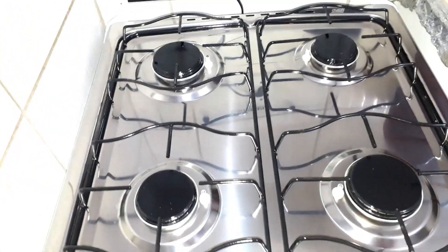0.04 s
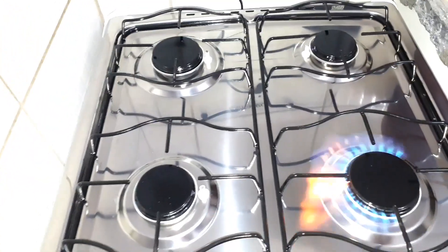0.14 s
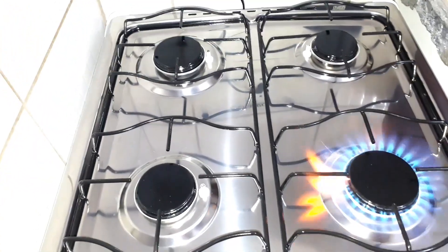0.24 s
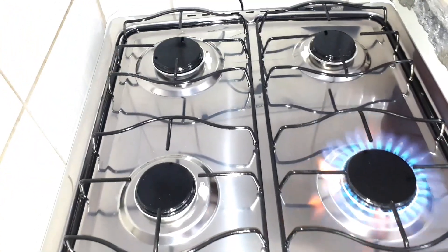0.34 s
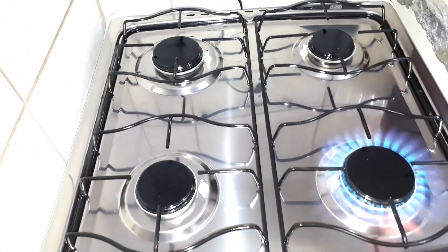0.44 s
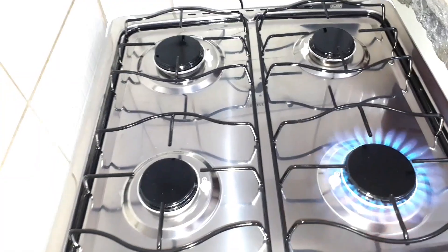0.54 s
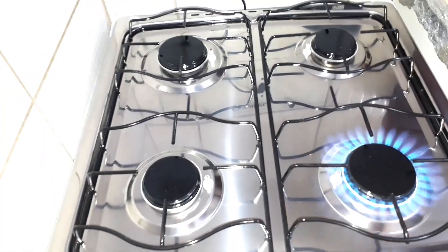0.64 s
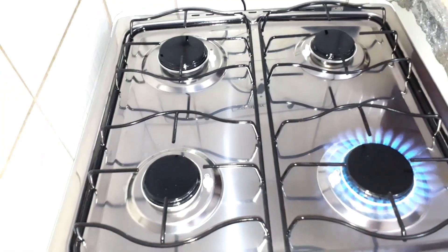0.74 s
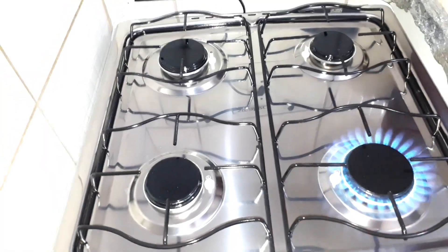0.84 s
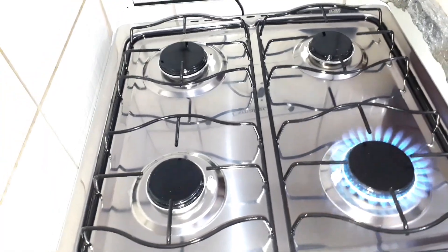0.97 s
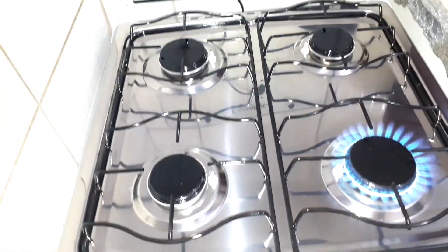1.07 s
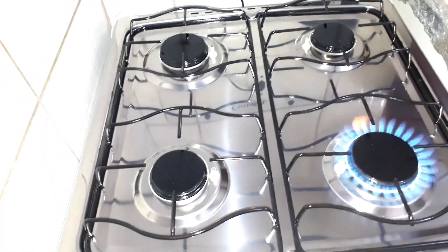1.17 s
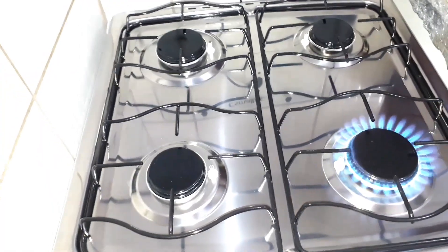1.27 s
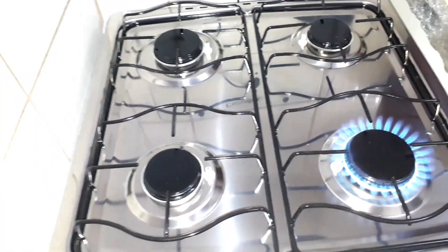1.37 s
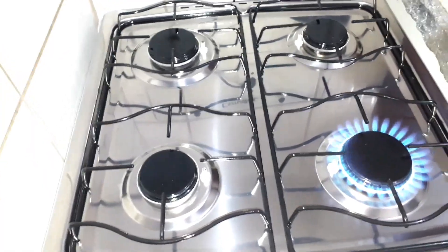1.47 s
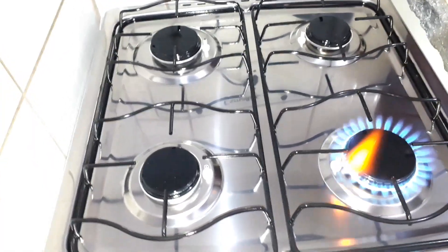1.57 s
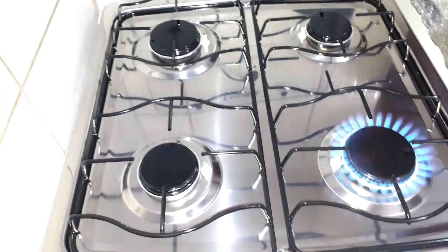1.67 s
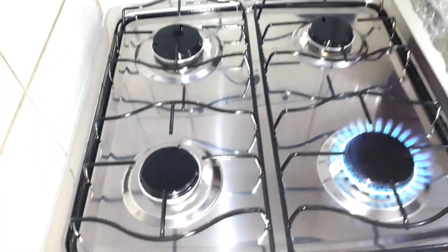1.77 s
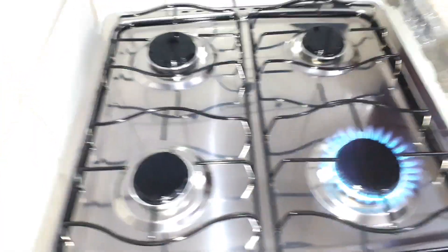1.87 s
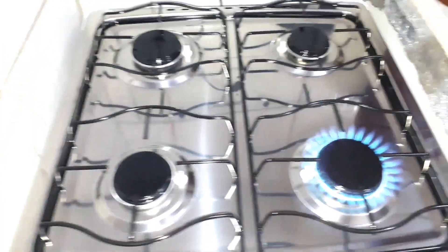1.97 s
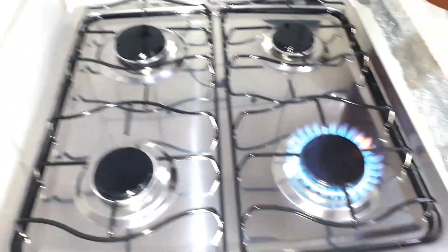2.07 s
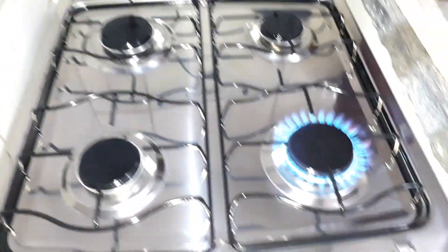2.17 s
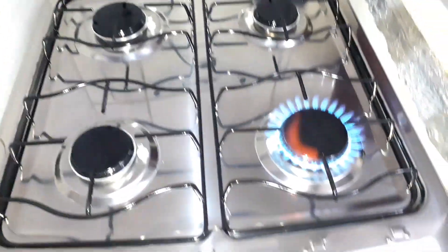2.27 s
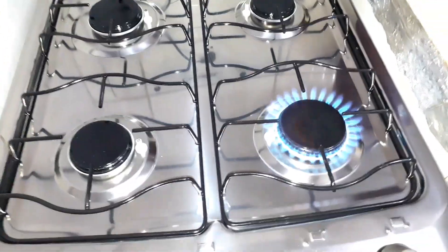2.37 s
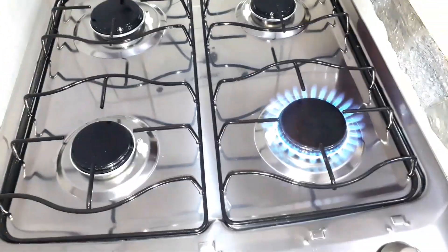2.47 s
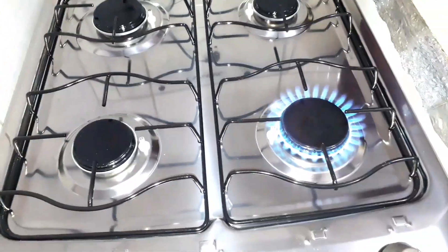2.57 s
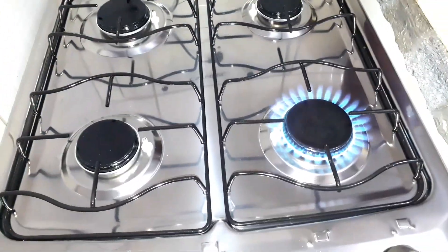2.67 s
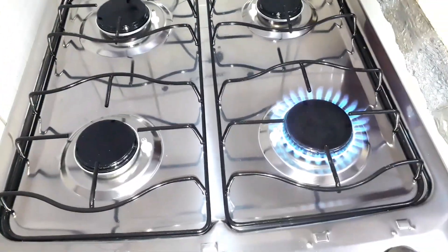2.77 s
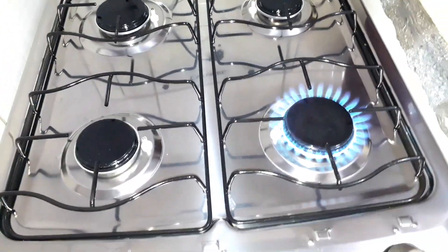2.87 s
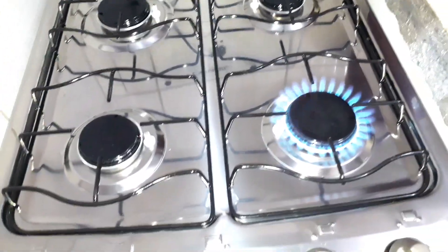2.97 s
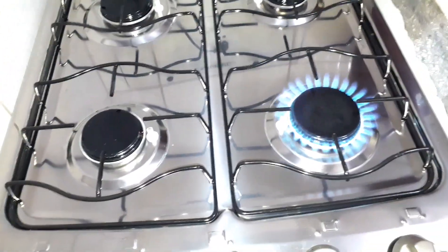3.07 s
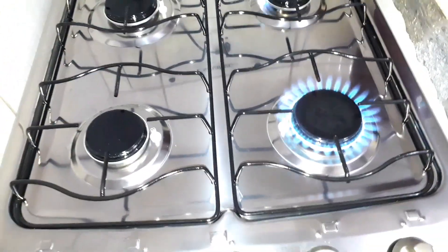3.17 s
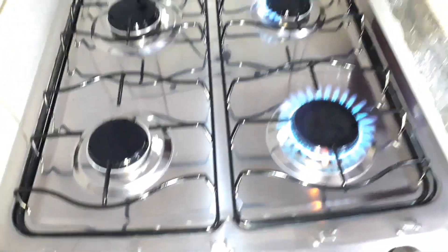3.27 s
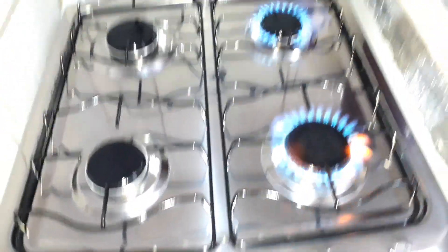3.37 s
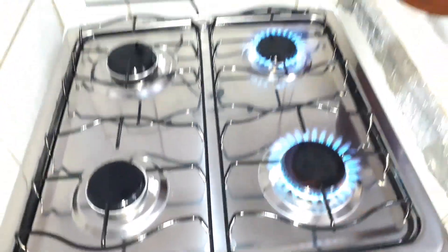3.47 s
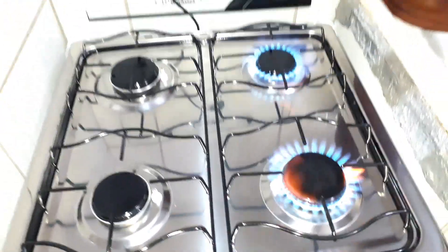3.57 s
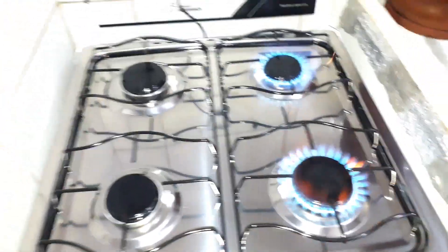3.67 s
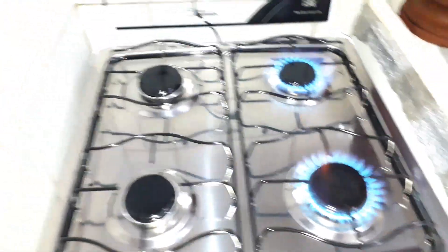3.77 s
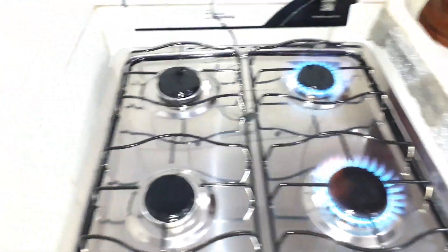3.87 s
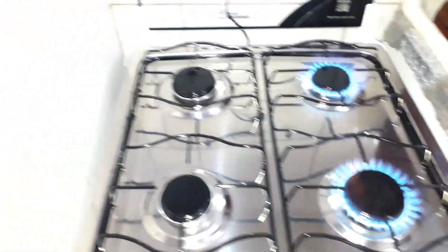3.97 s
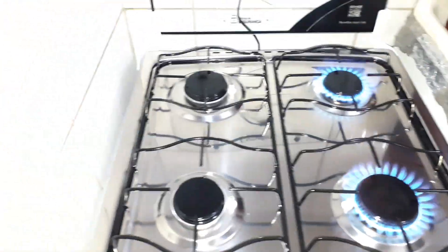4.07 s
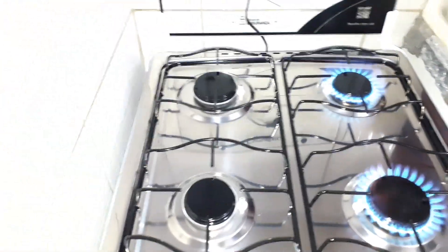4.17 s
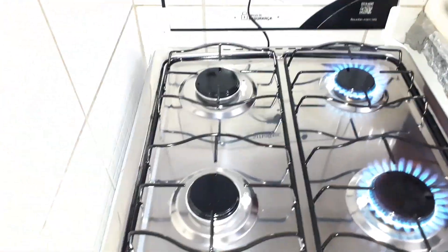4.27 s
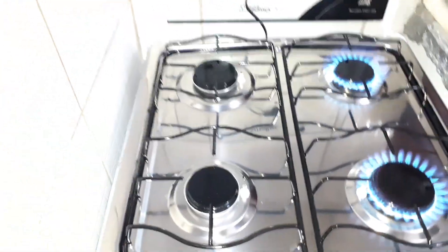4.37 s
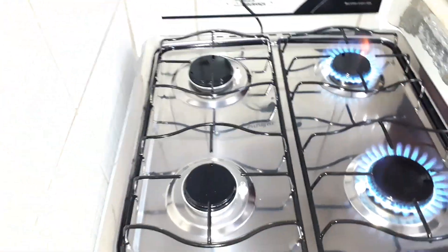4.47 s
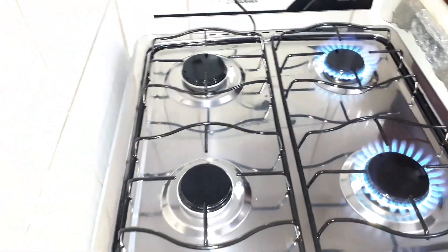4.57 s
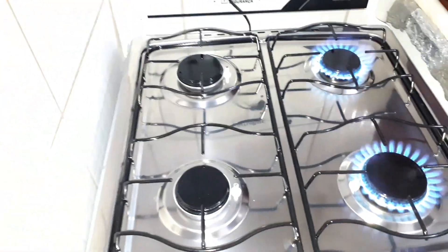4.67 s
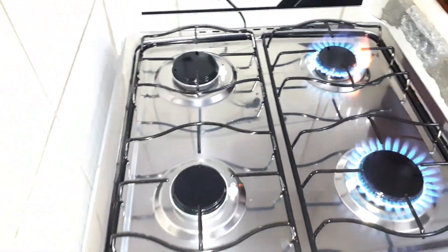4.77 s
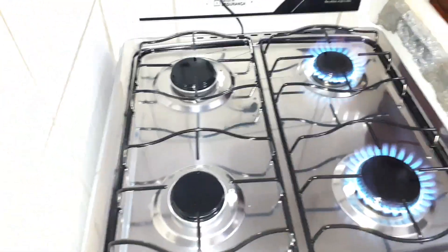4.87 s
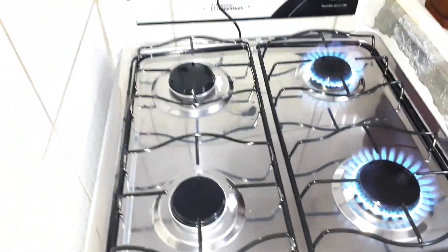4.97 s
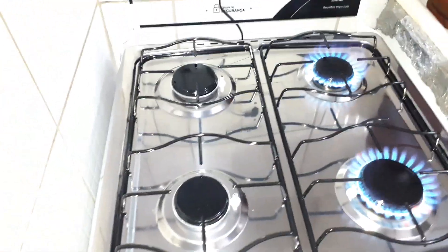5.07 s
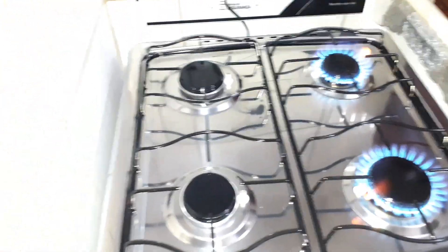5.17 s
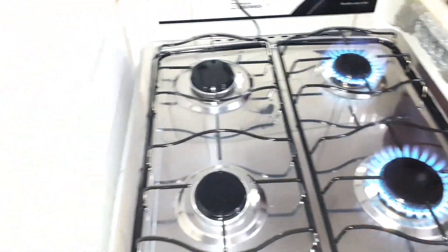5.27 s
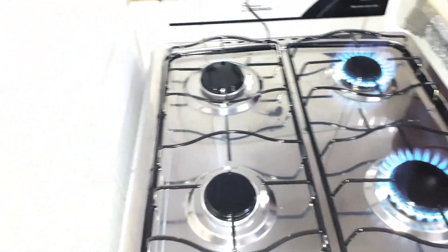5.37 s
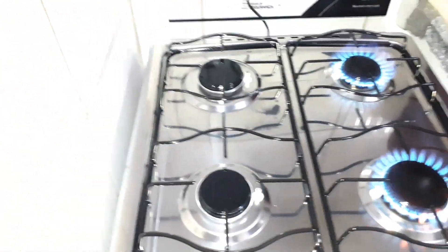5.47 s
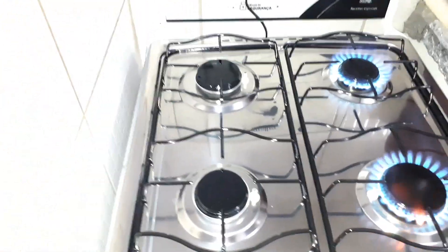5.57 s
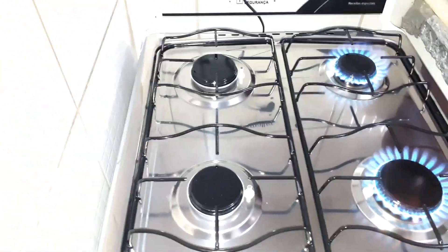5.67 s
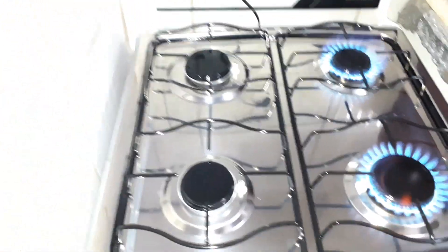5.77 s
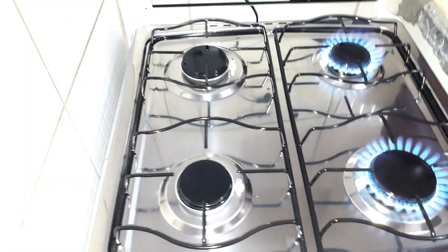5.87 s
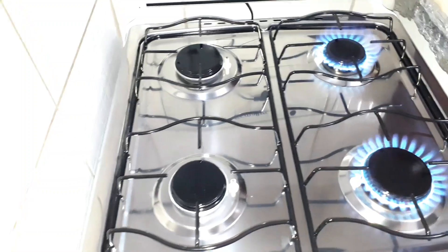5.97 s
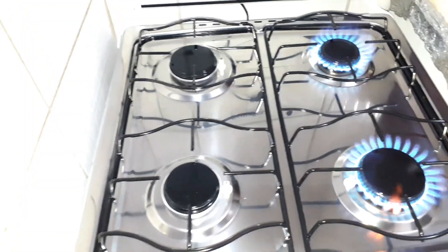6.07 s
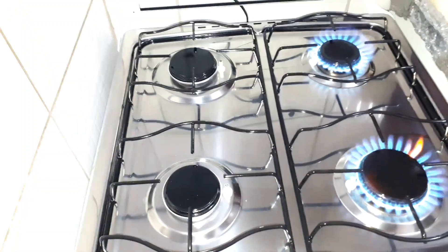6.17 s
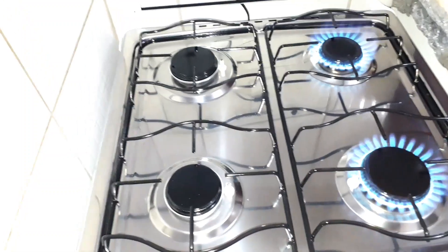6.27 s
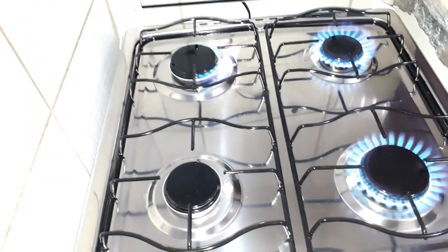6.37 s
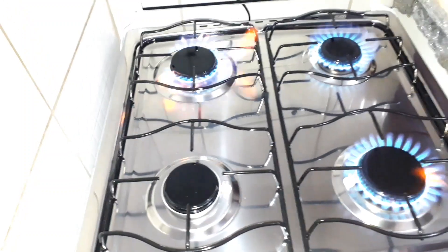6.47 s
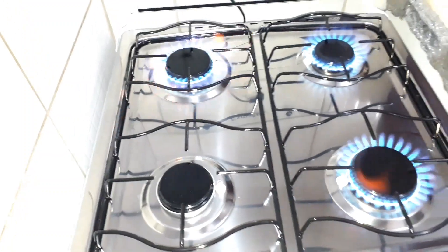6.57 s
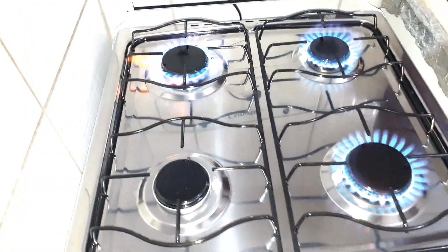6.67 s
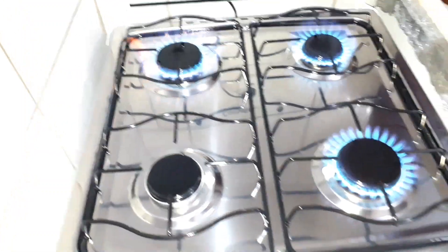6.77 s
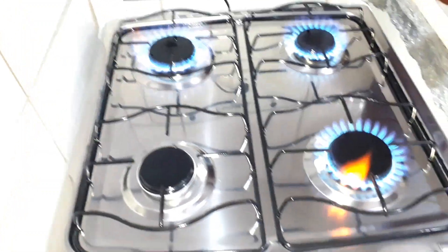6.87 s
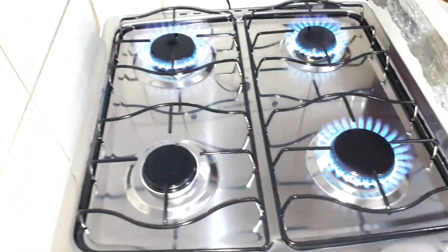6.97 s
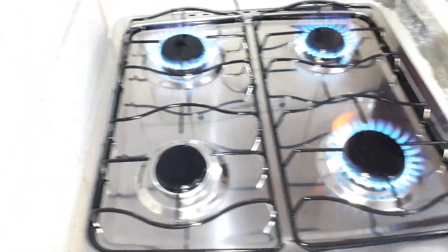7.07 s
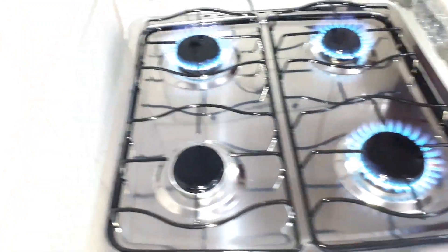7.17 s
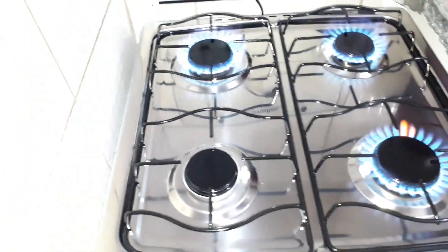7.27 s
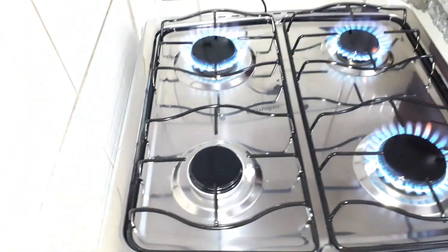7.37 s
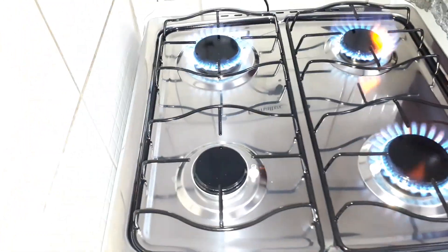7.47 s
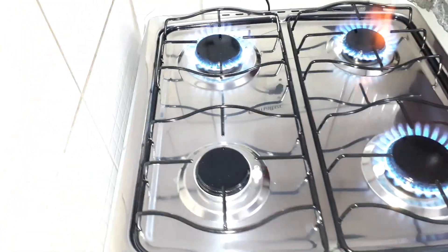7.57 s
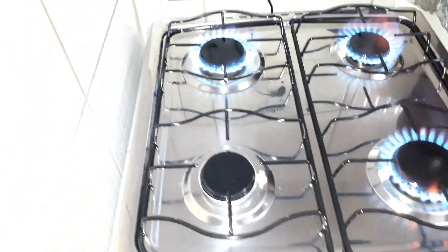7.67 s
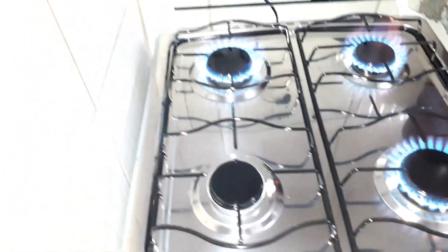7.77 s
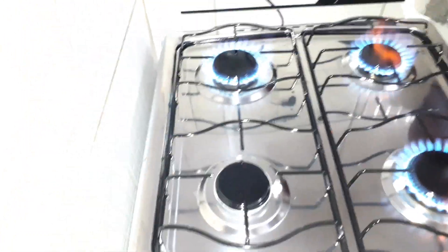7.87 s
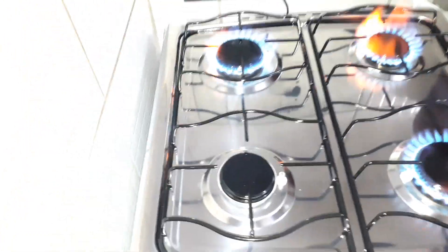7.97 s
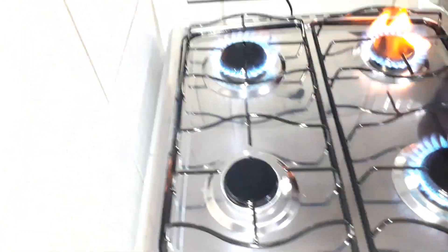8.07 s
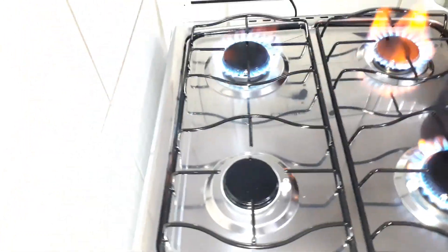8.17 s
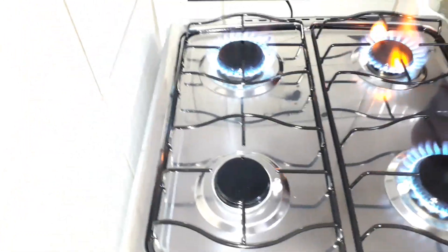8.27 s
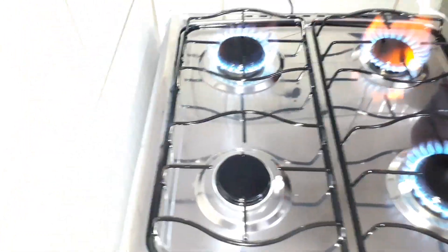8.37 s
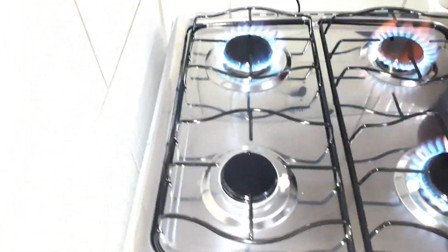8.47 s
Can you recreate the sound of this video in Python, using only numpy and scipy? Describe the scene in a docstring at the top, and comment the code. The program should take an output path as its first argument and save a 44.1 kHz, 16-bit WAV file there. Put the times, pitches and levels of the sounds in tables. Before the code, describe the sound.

Rapid spark ticks light three stove burners in turn, each puffing into a low fluttering flame, amid button snaps and clunks on sheet metal.

```python
"""A steel gas stove in a tiled kitchen, heard from just above: three burners are lit one after another.
A run of sparks ticks twelve times a second, some jolting the microphone circuit with a low pop; a burner catches.
Controls clunk on the sheet metal; twice more the igniter button snaps, sparks run and a burner catches.
Gas hiss, flame rumble and rush are shaped noise; the last jet whistles faintly and more knocks follow.
Each run of sparks pushes the recorder's gain down, and the flames swell back as it recovers."""
import sys
import numpy as np
from scipy import signal
from scipy.fft import rfft, irfft, next_fast_len
from scipy.io import wavfile
from scipy.ndimage import minimum_filter1d, map_coordinates

SR = 44100
rng = np.random.default_rng(int(sys.argv[2]) if len(sys.argv) > 2 else 0)


def persist_wave(psi):
    """Save psi, clipped to +-1, as 16-bit WAV."""
    counts = np.round(np.clip(psi, -1, 1) * 32767).astype(np.int16)
    wavfile.write(sys.argv[1], SR, np.atleast_2d(counts).T)


N = 376173

# Levels in the tables are relative; the functions add their own trims.
# flame rumble spectrum: (frequency [Hz], density [dB/Hz])
RUMBLE_SPECTRUM = [(25, -25), (50, -15), (100, -3), (165, 3.5), (220, -5), (320, -8), (420, -22.5),
                   (800, -32.5), (2000, -59.5)]
# flame rush spectrum: (frequency [Hz], density [dB/Hz])
RUSH_SPECTRUM = [(120, -29.5), (300, -8.5), (420, 0.5), (520, -3.5), (1000, -10), (1400, -12.5),
                 (2300, -14), (3200, -18), (4500, -30), (9000, -60)]
# kitchen and gas hiss spectrum: (frequency [Hz], density [dB/Hz])
HISS_SPECTRUM = [(1200, -32.5), (2000, -2), (2800, -3), (3150, -3), (3600, -11), (5300, -11), (6050, -8),
                 (7000, -10.5), (8200, -13), (8900, -3.5), (9550, -18), (10050, -9.5), (10700, -10),
                 (15800, -14)]
# burners catching: (time [s], steady rumble [dB], flare [dB], flare t60 [s])
BURNER_EVENTS = [(.2, -53, -32.5, 1.25), (3.25, -50, -33, 2.13), (6.52, -48, -22, 0.62)]
# warming burner caps: (time [s], level [dB])
CAP_TICKS = [(0.551, -33), (1.1643, -39), (1.2158, -38.5), (1.8904, -35.5), (4.721, -34.5), (4.827, -45),
             (7.6847, -40.5)]
# controls and hand knocking the stove: (time [s], strength [dB], rattle above strength [dB],
# thump above strength [dB], thump pitch [Hz], contact pitch [Hz])
KNOCK_EVENTS = [(1.5227, -24, -1, -11.5, 280, 3370), (2.228, -48, -18, 10.5, 310, 1540),
                (2.242, -53.5, 6.5, 2, 310, 3490), (2.256, -55, 0.5, 9.5, 310, 3260),
                (5.1227, -31.5, -17.5, -25, 260, 1620), (5.1376, -32, 3, -2.5, 260, 1650),
                (5.186, -34, 1, 4.5, 170, 1910), (5.393, -42, -11, -2, 260, 3100),
                (5.4546, -42, -3, 0, 260, 1760), (5.748, -40, -12.5, 7.5, 318, 3150),
                (7.879, -24, 3.5, 0.5, 235, 3770), (8.094, -44, 1.5, 1, 235, 2380),
                (8.1592, -42.5, -0.5, -9, 235, 2380), (8.448, -49.5, -11, 9, 300, 1600)]
# stove knock spectrum: (frequency [Hz], density [dB/Hz])
STOVE_SPECTRUM = [(30, -33), (60, -13), (110, -2), (180, -2.5), (260, 3.5), (460, -6), (580, -3),
                  (780, -6.5), (1100, -5.5), (1400, -8), (2500, -10), (3700, -15), (4600, -16.5),
                  (7800, -23.5), (8950, -17), (9800, -21.5), (16000, -37)]
# stove body decay: (frequency [Hz], t60 [s])
STOVE_DECAY = [(100, 0.87), (260, 1), (700, 0.9), (1800, 0.75), (4800, 0.59), (13000, 0.37)]
# sheet-metal modes of the hob: (frequency [Hz], level [dB], t60 [s])
STEEL_MODES = [(266.3, 5.5, 1), (798, 3, 0.1), (1005, -2, 0.44), (1700, -5, 0.38), (1940, 0, 0.27),
               (3000, -5, .35), (3170, -0.5, 0.69), (3460, -4.5, 0.27), (4040, -9, 0.22), (5750, -11, .28)]
# igniter button: (time [s], snap [dB], thud [dB], spring pitch [Hz], spring [dB])
BUTTON_EVENTS = [(2.846, -29, -43, 1766, -34.5), (6.2002, -27, -33, 2100, -37.5)]
# button snap spectrum: (frequency [Hz], density [dB/Hz])
SNAP_SPECTRUM = [(410, -41.5), (700, -28), (852, -9.5), (1140, -0.5), (1250, -2), (1380, -5), (1840, 2),
                 (2300, -10.5), (3200, 0.5), (3940, -5), (4800, 6), (5760, 2), (8990, 6), (12000, 2),
                 (16000, -14)]
# kitchen reverberation: (frequency [Hz], t60 [s])
KITCHEN_DECAY = [(300, 0.48), (800, 0.43), (2000, 0.44), (5500, 0.38), (9000, 0.35), (15000, 0.19)]
# igniter presses: (first spark [s], strength [dB], crack [dB], burner cap [dB])
SPARK_RUNS = [(0.0092, -1, -2, -21.5), (2.9257, -1, 0, -32), (6.2754, -0.5, 0.5, -21.5)]
# hard jolts of the microphone circuit: (time [s], pop [dB], opposite kick before it [share], rise [s])
POP_EVENTS = [(0.0089, -27.5, 0.05, 0.0001), (0.093, -18.5, 0.57, 0.000019), (0.1766, -14, 0.033, 0.000078),
              (0.2591, -17, 0.046, 0.000017), (0.3434, -16.5, 0.077, 0.000017),
              (3.1761, -17.5, 0.05, 0.00012), (6.3594, -36.5, 0.11, 0.000066),
              (6.5256, -33.5, 0.36, .00003)]
# spark crack spectrum: (frequency [Hz], density [dB/Hz])
CRACK_SPECTRUM = [(120, -47), (200, -18.5), (777, -13.5), (2210, -7), (3560, -8), (3900, -11), (5630, -4),
                  (7830, -3), (8900, 4.5), (9750, 2), (15100, 0.5), (16000, -19.5)]
# spark echo off the tiles: (frequency [Hz], density [dB/Hz])
TILE_SPECTRUM = [(120, -29), (200, -7.5), (763, -20), (851, -17.5), (1500, -17), (1680, -16.5),
                 (2170, -18.5), (3070, -15), (4040, -15), (6880, -9), (7830, -11), (8900, -3),
                 (15100, -2.5), (16000, -0.5)]

T_S = np.arange(SR) / SR  # time since a blow
SPARK_RATE_HZ, SPARK_SCATTER_DB = 11.976, 2.24
HARD_BLOW_DB = -22.5
CONTACT_DB_PER_DB = 1.82  # contact click against blow strength
PANEL_SHARE = 0.11  # how far the panels follow the rattle
GAS_LEAD_S, SETTLE_S = 0.4, 0.16  # gas flows before it catches; time constant of gas and flames
HUM_HZ, HUM_DB = 59.3, -69
RUSH_DB = -8  # above the rumble, before flutter
HISS_DB, JET_POWER_SHARE = -64.5, 0.65  # kitchen hiss; power each open jet adds to it
BOX_HZ, BOX_T60_S, BOX_DB = 305, 0.15, 1.5  # box under the hob: default lowest mode
UPPER_HZ, UPPER_T60_S, UPPER_DB = 430, 0.12, -4  # and its next mode
WHISTLE_HZ, WHISTLE_WIDTH_HZ, WHISTLE_DB = 3150, 120, -68.5
THRESHOLD_DB, CUT_DB_PER_DB = -39.5, 0.69  # gain control
ATTACK_S, HOLD_S, RECOVER_DB_PER_S = 0.33, 0.41, 10.5
TOP_HZ = 16000  # recorder's band limit


def amp(db):
    """Decibels to gain."""
    return 10 ** (np.asarray(db) / 20)


def unit(x):
    """Scale to rms 1."""
    return x / np.sqrt(np.mean(x ** 2) + 1e-20)


def level(x, db):
    """Set the rms level of a blow's first 40 ms."""
    return x * amp(db) / np.std(x[:SR // 25])


def since(s):
    """Seconds since a moment, zero before it."""
    return np.maximum(np.arange(N) / SR - s, 0)


def decay(t60_s):
    """Exponential fall of 60 dB in t60."""
    return np.exp(-np.log(1000) * T_S / t60_s)


def build_up(tau_s):
    """Exponential approach to 1 from the start of a blow."""
    return 1 - np.exp(-T_S / tau_s)


def along(points, hz):
    """(Hz, value) points interpolated on a log frequency axis."""
    f, v = np.transpose(points)
    return np.interp(np.log(hz + 1), np.log(f + 1), v)


def wobble(rate_hz):
    """Smooth random curve with rate_hz knots a second."""
    knots = rng.standard_normal(int(N * rate_hz / SR) + 4)
    return map_coordinates(knots, [np.arange(N) * rate_hz / SR])


def add(track, s, sound):
    """Mix a sound into a track at a time."""
    part = track[max(round(s * SR), 0):][:len(sound)]
    part += sound[:len(part)]


def band(x, hz, kind, order=2):
    """Butterworth filter."""
    return signal.sosfilt(signal.butter(order, hz, kind, fs=SR, output='sos'), x)


def colour(x, spectrum):
    """Minimum-phase filter of unit power gain with the given (Hz, dB) shape."""
    m = 2 * next_fast_len(len(x) // 2 + SR // 8)
    gain = unit(amp(along(spectrum, np.fft.rfftfreq(m, 1 / SR))))
    cepstrum = irfft(np.log(np.maximum(gain, 1e-6)))
    # fold the cepstrum to positive time: causal
    cepstrum[1:m // 2] *= 2
    cepstrum[m // 2 + 1:] = 0
    return irfft(rfft(x, m) * np.exp(rfft(cepstrum)))[:len(x)]


def shaped_noise(spectrum):
    """Steady noise of rms 1 with the given spectrum."""
    return unit(colour(rng.standard_normal(N), spectrum))


def burst(t60_s):
    """A short puff of noise."""
    return rng.standard_normal(SR) * decay(t60_s)


def dying(decays):
    """Dense reflections: noise whose every frequency dies at its own speed."""
    hz, t_s, z = signal.stft(rng.standard_normal(SR), SR, nperseg=256)
    fall = amp(-60 * t_s / along(decays, hz)[:, None])
    return signal.istft(z * fall, SR, nperseg=256)[1][:SR]


def resonance(hz, t60_s, width=.12, wet_db=-14):
    """A struck resonance and its narrow echo in the kitchen."""
    direct = np.sin(2 * np.pi * hz * T_S) * decay(t60_s)
    edges_hz = [hz / (1 + width), hz * (1 + width)]
    echo = band(dying(KITCHEN_DECAY), edges_hz, 'bandpass', order=1)
    return direct + level(echo, wet_db)


def hollow(tone_hz=BOX_HZ, width=0.053, wet_db=0.5):
    """The thump of the box under the hob: a lowest mode of given pitch and a fixed upper one."""
    lowest = amp(BOX_DB) * resonance(tone_hz, BOX_T60_S, width, wet_db)
    upper = amp(UPPER_DB) * resonance(UPPER_HZ, UPPER_T60_S, width, wet_db)
    return lowest + upper


def nearby(x, gain=0.063, reach_s=.022, count=12):
    """Tiles and steel close to the microphone add weak copies that ripple the spectrum."""
    out = x.copy()
    lags_s = rng.uniform(.005, reach_s, count)
    for lag_s, sign in zip(lags_s, rng.choice([-1, 1], count)):
        add(out, lag_s, sign * gain * x)
    return out


def hum():
    """Mains hum in the kitchen: one sine."""
    return amp(HUM_DB) * np.sin(2 * np.pi * HUM_HZ * since(0))


def opening(s):
    """Gas or flame settling exponentially from a moment on."""
    return 1 - np.exp(-since(s) / SETTLE_S)


def hiss():
    """Kitchen hiss, to which each jet adds power once its gas flows."""
    jets = sum(opening(s - GAS_LEAD_S) for s, *_ in BURNER_EVENTS)
    return np.sqrt(1 + JET_POWER_SHARE * jets) * amp(HISS_DB) * shaped_noise(HISS_SPECTRUM)


def whistle():
    """The last jet opened whistles faintly once its gas flows: narrow-band noise."""
    flow = opening(BURNER_EVENTS[-1][0] - GAS_LEAD_S)
    edges_hz = [WHISTLE_HZ - WHISTLE_WIDTH_HZ / 2, WHISTLE_HZ + WHISTLE_WIDTH_HZ / 2]
    return amp(WHISTLE_DB) * flow * unit(band(rng.standard_normal(N), edges_hz, 'bandpass'))


def flames(flutter_db=1.9, flicker_db=-0.6):
    """Flames rumble, and rush and flutter above that; each burner adds its own power."""
    roar = np.sqrt(sum(amp(db) ** 2 * opening(s) for s, db, *_ in BURNER_EVENTS))
    rush_db = RUSH_DB + flutter_db * wobble(12) + flicker_db * wobble(22)
    return roar * (shaped_noise(RUMBLE_SPECTRUM) + amp(rush_db) * shaped_noise(RUSH_SPECTRUM))


def flares(swell_s=0.17, low_hz=250, high_hz=1250):
    """As a burner catches, band noise swells and dies away."""
    swell = np.zeros(N)
    for s, _, db, t60_s in BURNER_EVENTS:
        swell += amp(db - 60 * since(s) / t60_s) * (1 - np.exp(-since(s) / swell_s))
    return swell * unit(band(rng.standard_normal(N), [low_hz, high_hz], 'bandpass'))


def ticks(tick_db=1, cap_hz=3100):
    """Burner caps tick faintly as they warm: a brief resonance and a puff of noise."""
    out = np.zeros(N)
    for s, db in CAP_TICKS:
        tick = resonance(cap_hz, t60_s=0.0041, width=1.0, wet_db=-22.0) + .5 * burst(t60_s=0.062)
        add(out, s, amp(db + tick_db) * tick)
    return band(out, [2300, 3900], 'bandpass', order=3)


def steel(spread_db=2, drift_rad=0.01):
    """The hob's modes, struck at random strengths; random phase drift makes each ring waver."""
    hz, db, t60_s = np.transpose(STEEL_MODES)[:, :, None]
    strength = amp(db + spread_db * rng.standard_normal(hz.shape))
    drift = drift_rad * np.cumsum(rng.standard_normal((len(STEEL_MODES), SR)), axis=1)
    return np.sum(strength * decay(t60_s) * np.sin(2 * np.pi * hz * T_S + drift), 0)


def knocks(body_db=-4, panel_db=-2.0, rattle_db=-4.5, ring_db=-11, contact_db=-2.5, thump_db=-2, chatter_db=2):
    """A sharp contact and a thump, then the hollow body, its panels and the loose grates ring on."""
    out = np.zeros(N)
    for s, db, bright_db, box_db, box_hz, contact_hz in KNOCK_EVENTS:
        chatter = amp(chatter_db * wobble(140)[:SR])  # loose grates make the decay lumpy
        strike = 5 * burst(t60_s=0.0014) + 0.31 * burst(t60_s=0.048)
        blow = colour(chatter * dying(STOVE_DECAY) + strike, STOVE_SPECTRUM)
        blow = level(blow, 0) + level(steel(), ring_db)
        body = level(band(blow, 540, 'lowpass', order=4), db + body_db)
        panel = band(blow, [700, 4200], 'bandpass', order=4)
        panel = level(panel, db + PANEL_SHARE * bright_db + panel_db)
        rattle = level(band(blow, 6200, 'highpass', order=3), db + bright_db + rattle_db)
        # harder blows click more sharply; a click lasts a few cycles
        hit_db = contact_db + CONTACT_DB_PER_DB * (db - HARD_BLOW_DB)
        contact = amp(hit_db) * resonance(contact_hz, t60_s=30 / contact_hz, width=0.25, wet_db=-21.5)
        contact = band(contact, 4900, 'lowpass', order=4)
        thump = level(hollow(box_hz), db + box_db + thump_db)
        add(out, s, body + panel + rattle + contact + thump)
    return out


def button(snap_db=-1, thud_db=-1, spring_db=-1, overtone_hz=5450, overtone_db=-25, lower_ratio=0.84, lower_db=-4):
    """The button under the hob's edge snaps in, thuds on the box and its spring rings in the room."""
    out = np.zeros(N)
    for s, db, low_db, hz, ring_db in BUTTON_EVENTS:
        snap = colour(dying(KITCHEN_DECAY) + 1.1 * burst(t60_s=0.037), SNAP_SPECTRUM)
        spring = amp(ring_db + spring_db) * resonance(hz, t60_s=0.057, width=0.077, wet_db=-5)
        # a lower mode outlasts it
        lower = resonance(hz * lower_ratio, t60_s=0.11, width=0.098, wet_db=-6.5)
        spring += amp(ring_db + lower_db) * lower
        spring += amp(overtone_db) * resonance(overtone_hz, t60_s=0.031, width=0.042, wet_db=-17)
        thud = level(hollow(tone_hz=324), low_db + thud_db)
        add(out, s, level(snap, db + snap_db) + thud + spring)
    return out


def discharges(count=5):
    """Each press fires an even run of sparks: rows of (time [s], strength, crack, cap [dB])."""
    return [(s + k / SPARK_RATE_HZ, db + SPARK_SCATTER_DB * rng.standard_normal(), crack_db, cap_db)
            for s, db, crack_db, cap_db in SPARK_RUNS for k in range(count)]


def pops(pop_db=19, leak_db=-25, fall_s=0.0017, rise_s=0.00006, cut_hz=85, kick_s=0.00052):
    """High voltage jolts the microphone circuit, whose bass filter swings back: faintly per spark, hard at some."""
    out = np.zeros(N)
    kick = np.sin(np.pi * np.minimum(T_S / kick_s, 1)) ** 2

    def jolt(edge_s):
        """Fast rise, slower fall."""
        return np.exp(-T_S / fall_s) - np.exp(-T_S / edge_s)

    for s, db, *_ in discharges():
        add(out, s + kick_s, -amp(db + leak_db) * jolt(rise_s))
    for k, (s, db, back, edge_s) in enumerate(POP_EVENTS):
        size = (-1) ** k * amp(db + pop_db)  # polarity alternates
        add(out, s, back * size * kick)
        add(out, s + kick_s, -size * jolt(edge_s))
    return band(out, cut_hz, 'highpass', order=3)


def sparks(wall_s=0.0071, wall_db=-7, crack_db=-9.0, room_db=-16, build_s=0.0023, same_path=0.56, cap_hz=3450, cap_db=5):
    """Each discharge cracks at near and far electrodes, rings a cap, bounces off the wall and fills the kitchen."""
    cracks, room, caps = np.zeros((3, N))
    share = np.clip(same_path, 0, 1)
    walls = dying(KITCHEN_DECAY)  # echo part common to all sparks
    for s, db, direct_db, ping_db in discharges():
        crack = 1.5 * burst(t60_s=0.0017) + 0.5 * burst(t60_s=0.038)
        for lag_s, gain in [(.001, 0.95), (.0025, 0.65)]:  # further electrodes
            add(crack, lag_s * rng.uniform(.8, 1.1), gain * burst(t60_s=0.0061))
        direct = amp(db + direct_db + crack_db)
        add(cracks, s, direct * crack)
        bounce = burst(t60_s=.012) * build_up(0.00027)
        add(cracks, s + wall_s, direct * amp(wall_db) * bounce)
        ping = resonance(cap_hz, t60_s=0.0084, width=0.18, wet_db=-36.0)
        add(caps, s, amp(db + ping_db + cap_db) * ping)
        echo = np.sqrt(share) * walls + np.sqrt(1 - share) * dying(KITCHEN_DECAY)
        add(room, s + wall_s, amp(db + room_db) * echo * build_up(build_s))
    return colour(cracks, CRACK_SPECTRUM) + colour(room, TILE_SPECTRUM) + caps


def scene():
    """Everything at one microphone above the hob."""
    fire = nearby(flares() + flames() + hiss(), gain=0.11, reach_s=.03)
    struck = nearby(ticks() + knocks() + button() + sparks())
    return (hum() + whistle() + fire + pops() + struck)[None]


def smooth(x, tau_s):
    """One-pole lowpass."""
    pole = np.exp(-1 / (tau_s * SR))
    return signal.lfilter([1 - pole], [1, -pole], x)


def gain_control(x, sense_hz=11000, window_s=0.052):
    """Shrill sound turns the gain down; it stays down a moment, then creeps back."""
    treble_power = smooth(band(x, sense_hz, 'highpass', order=4) ** 2, window_s)
    treble_db = 10 * np.log10(treble_power + 1e-12)
    cut_db = smooth(CUT_DB_PER_DB * np.maximum(treble_db - THRESHOLD_DB, 0), ATTACK_S)
    half = round(HOLD_S * SR / 2)
    # deepest cut within the past hold time
    held_db = -minimum_filter1d(-cut_db, 2 * half + 1, origin=half, mode='constant')
    creep_db = RECOVER_DB_PER_S * since(0)
    return x * amp(creep_db - np.maximum.accumulate(held_db + creep_db))


def record(dry):
    """The recorder rides its gain, clips at full scale and keeps nothing above its band limit."""
    m = next_fast_len(N + SR // 2)
    keep = np.clip((TOP_HZ - np.fft.rfftfreq(m, 1 / SR)) / 300 + .5, 0, 1)  # 300 Hz wide slope
    clipped = np.clip(gain_control(dry[0]), -1, 1)
    return irfft(rfft(clipped, m) * keep, m)[None, :N]


dry = scene()
out = record(dry)
persist_wave(out)
```